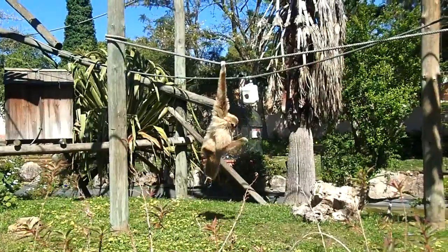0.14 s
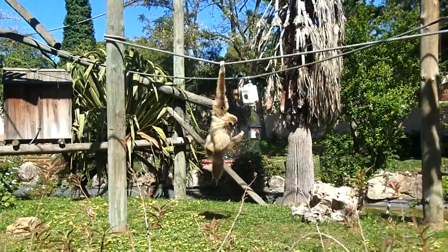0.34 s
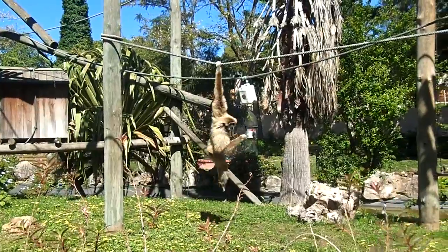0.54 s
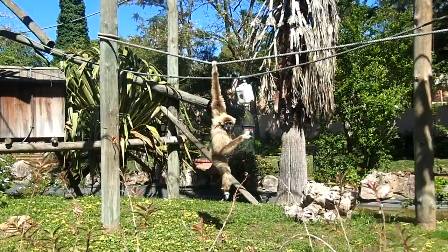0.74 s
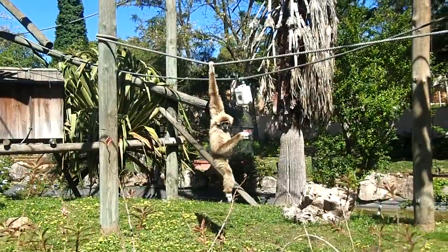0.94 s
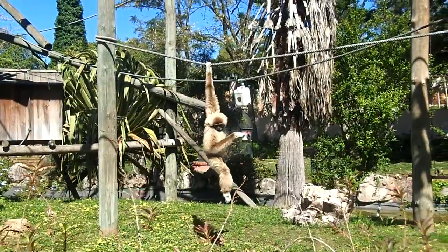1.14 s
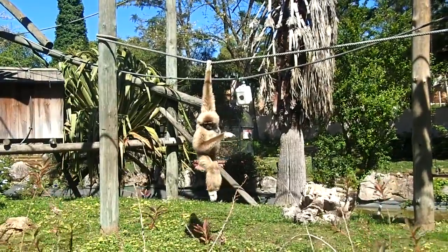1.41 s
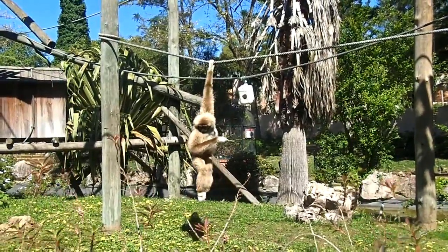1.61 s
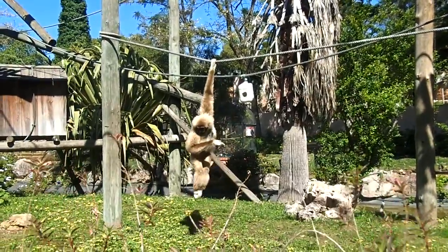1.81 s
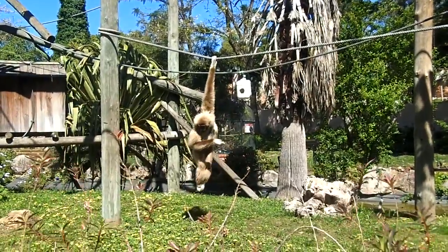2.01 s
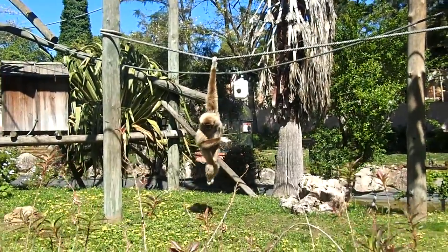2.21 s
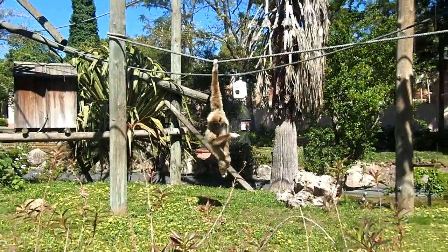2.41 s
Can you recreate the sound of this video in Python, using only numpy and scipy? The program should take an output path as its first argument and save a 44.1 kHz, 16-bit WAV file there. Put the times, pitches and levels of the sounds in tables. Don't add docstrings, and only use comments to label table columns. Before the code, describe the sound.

A gibbon gives short, rising, near-pure whoops in an open enclosure, over steady hiss and faint birds

```python
import sys
import numpy as np
from scipy import signal
from scipy.fft import rfft, irfft
from scipy.io import wavfile
from scipy.ndimage import uniform_filter1d, map_coordinates

SR = 44100
rng = np.random.default_rng(int(sys.argv[2]) if len(sys.argv) > 2 else 0)


def to_wav(s):
    ch = np.atleast_2d(s).T
    pcm = np.round(np.clip(ch, -1, 1) * 32767)
    wavfile.write(sys.argv[1], SR, pcm.astype(np.int16))


def nominal_scale(level):
    x = np.asarray(level, float) / 20
    return 10 ** x


N = 112454

# (time [s], pitch [Hz], level [dB], second partial [dB], upper partials [dB])
EARLIER_WHOOP = [
    (-.2, 739.8, -7, -40, -4),
    (-.1, 800, -32, -51, -7),
    (-.04, 903.4, -20, -48, -6),
]
WHOOPS = [
    [(0.17, 608, -46, -66, -35), (0.188, 620, -29.5, -50, -19), (0.206, 627, -18.5, -48, -1.5),
     (0.228, 677, -22, -40, -3), (0.24, 714, -24, -45, -4), (0.258, 730, -15, -38, 2.5),
     (0.34, 849.5, -14, -44, -4.5), (0.352, 871.6, -21, -38, -6), (0.368, 868, -32, -52, -29)],
    [(0.765, 595, -40, -56, -18), (0.793, 592, -40.5, -62, -13), (0.805, 612, -27.5, -50, 0),
     (0.829, 645, -21, -48, -9), (0.853, 685, -21, -56, 7), (0.864, 708, -28.5, -37, -1.5),
     (0.889, 751, -16.5, -42, -1.5), (0.925, 912.6, -19.5, -37.5, 5.5), (0.955, 901, -29, -50.5, -26)],
    [(1.34, 520, -46, -67, -25), (1.37, 538, -28.5, -71, -21), (1.392, 603, -37, -62, -20),
     (1.41, 645, -22, -61, -14), (1.43, 678, -18.5, -60, -10), (1.442, 721, -21.5, -49, -6),
     (1.456, 761, -15.5, -56, -4), (1.477, 873.5, -19.5, -39, 3.5), (1.497, 866, -21.5, -40, -13)],
]
LAST_WHOOP = [(2.07, 568, -49.5, -65, -35), (2.117, 619, -35.5, -60, -29), (2.142, 640, -19, -62, -15),
              (2.155, 663, -24, -60, -22), (2.165, 726, -42, -62, -30), (2.184, 780, -17.5, -55, -20),
              (2.202, 884, -20, -58, -11.5), (2.22, 967, -35.5, -56, -5), (2.261, 963, -36, -68, -25.5)]
# (third partial [dB], even partials [dB])
WHOOP_COLOURS = [
    (-48.5, -3),
    (-47, 2.5),
    (-40, 1.5),
    (-64, -2),
    (-49, -4),
]
# (frequency [Hz], level [dB])
THROATS = [
    [(3700, -56), (4550, -41), (5350, -31), (6100, -46), (6600, -36), (7150, -49), (7900, -38), (8800, -62)],
    [(4100, -66), (4450, -44), (4900, -54), (5550, -42), (6000, -57), (7100, -64), (7600, -52), (8100, -66)],
    [(3950, -60), (4380, -38), (4800, -47), (5250, -38), (5800, -37), (6250, -52), (7000, -54), (8000, -64)],
]
# (frequency [Hz], level [dB])
CHEEK = [(1800, -32), (2000, -9), (2120, 0.5), (2250, -5), (2400, -8), (2700, -31)]

# (frequency [Hz], level [dB per Hz])
AIR_LOW = [(18, 6.5), (30, -12), (118, -11), (245, -15), (378, -11.5), (474, -10), (706, -13), (855, -5.5),
           (1900, -26), (2470, -64), (4180, -120)]
AIR_HIGH = [(1900, -28), (2250, -24), (3100, -8.5), (3950, -31), (4700, 1.5), (7800, -5.5), (9500, -13),
            (15750, -19.5)]
# (frequency [Hz], level [dB per Hz])
WATER = [(100, -8.5), (300, -8), (500, -4), (900, -6), (1650, -2.5), (1900, -10), (2600, -16),
         (3100, -12.5)]
FLOCK = [(3200, -14.5), (4000, -18), (4600, -5.5), (5150, 0), (6300, -14), (7200, -24.5), (7900, -10.5),
         (9200, -29)]
# (time [s], level [dB])
FLOCK_LEVEL = [(0.0, -40.5), (0.18, -39.5), (0.83, -39), (1.07, -41), (1.3, -43), (1.61, -38.5),
               (2.15, -41)]
# (frequency [Hz], likeness [0 to 1])
LIKENESS = [(50, 0.86), (150, .94), (400, 0.95), (1200, 0.99), (3000, 0.97), (5500, 0.8), (8500, 0.46),
            (13000, 0.0088)]
# (frequency [Hz], left over right [dB])
LEANING = [(60, 0.43), (300, 1.2), (1500, .2), (5000, 3.4), (8000, 4.9), (13000, 1.5)]
# (frequency [Hz], level at first [dB], level later [dB], wobble [dB])
PUMP_TONES = [(50.3, -65.5, -51, 3.5), (109.6, -53, -53, 1.5), (135.6, -53.5, -72, 5)]

# (time [s], length [s], centre [Hz], level [dB])
CHIRPS = [(0.427, 0.055, 5170, -40.5), (0.614, 0.057, 5290, -41.5), (0.711, 0.023, 5440, -44),
          (0.757, 0.028, 5140, -44), (0.975, 0.027, 5090, -34.5), (1.728, 0.038, 5060, -39.5),
          (1.798, 0.053, 4970, -40.5), (1.844, 0.038, 5100, -54), (1.603, 0.065, 6190, -46),
          (1.613, 0.08, 6460, -49), (1.466, 0.03, 6630, -40.5)]
# (time [s], length [s], start pitch [Hz], end pitch [Hz], level [dB])
WHISTLES = [(.556, 0.0305, 6300, 6960, -40.5), (.585, 0.035, 7000, 6760, -47),
            (.638, 0.019, 5800, 6300, -43.5), (.66, 0.064, 6200, 6200, -47.5),
            (.725, 0.032, 4700, 4510, -41.5), (.755, 0.014, 5500, 5740, -44),
            (.936, 0.02, 4700, 4450, -39.5), (1.02, 0.033, 4500, 4580, -50), (1.12, 0.019, 5050, 5100, -42),
            (2.11, .022, 5480, 5530, -50.5), (2.128, 0.02, 5500, 4950, -48),
            (2.093, 0.009, 5100, 5430, -46), (2.2, 0.031, 5350, 5840, -54),
            (2.228, 0.044, 6100, 6500, -51.5), (2.3, 0.0152, 5900, 6300, -49),
            (2.308, 0.071, 6370, 6260, -48.5), (2.34, 0.05, 6350, 6100, -64)]
# (time [s], length [s], start pitch [Hz], end pitch [Hz], level [dB])
MATE_CALLS = [
    (.56, 0.255, 849, 880, -48),
    (1.96, 0.122, 839.4, 848, -51),
]
# (time [s], length [s], start pitch [Hz], end pitch [Hz], level [dB])
DRONE = [
    (.82, 0.452, 286.6, 289.7, -53.5),
]
# (time [s], level [dB])
TICKS = [
    (1.812, -40),
    (2.345, -48),
    (2.41, -52),
    (2.538, -49),
]

LEAD = SR // 2
T = np.arange(-LEAD, N) / SR
CHANGE_S = 1.5 + 0.6502


def rms_one(x):
    return x / np.sqrt(np.mean(x ** 2) + 1e-20)


def at_hz(points, hz):
    table_hz, values = np.array(points)[:, 0], np.array(points)[:, 1]
    return np.interp(np.log(hz), np.log(table_hz), values)


def drift(rate):
    knots = rng.standard_normal(400)
    place = np.clip(np.arange(N) / SR * rate * 2, 0, 399)
    return map_coordinates(knots, [place], order=3)


def shaken(width_hz):
    low_pass = signal.butter(2, width_hz, fs=SR, output="sos")
    a, b = signal.sosfilt(low_pass, rng.standard_normal((2, len(T))))
    return rms_one(a) + 1j * rms_one(b)


def gate(start, length, edge):
    inside = np.minimum(T - start, start + length - T)
    return np.sin(np.pi / 2 * np.clip(inside / edge, 0, 1)) ** 2


def glides(rows, edge, second_db, shake):
    out = 0
    waver = 1 + shake * shaken(70.0)
    for start, length, from_hz, to_hz, db in rows:
        hz = np.interp(T, [start, start + length], [from_hz, to_hz])
        turn = np.exp(2j * np.pi * np.cumsum(hz) / SR)
        tone = np.real(waver * (turn + nominal_scale(second_db) * turn ** 2))
        out = out + nominal_scale(db) * gate(start, length, edge) * tone
    return out


def hiss(spectrum, patchy_db):
    hz = np.maximum(np.arange(N // 2 + 1) * SR / N, 1)
    inside = (hz > spectrum[0][0]) & (hz < spectrum[-1][0])
    mid, side = rfft(rng.standard_normal((2, N))) * nominal_scale(at_hz(spectrum, hz)) * inside
    alike = np.clip(at_hz(LIKENESS, hz), 0, 1)
    lean = at_hz(LEANING, hz) / 2
    pair = np.sqrt(1 + alike) * mid + np.sqrt(1 - alike) * side * [[1], [-1]]
    pair = pair * nominal_scale([lean, -lean])
    band = np.round(2 * np.log2(hz))
    together = drift(3.05)
    out = 0
    for k in np.unique(band[inside]):
        flicker_db = patchy_db * (1.24 * together + drift(11.0))
        out = out + irfft(pair * (band == k), N) * nominal_scale(flicker_db)
    return rms_one(out)


def echoes(x, wet_db):
    early_t60_s, late_t60_s, late_db, gap_s = 0.31, 1.135, -10, 0.0119
    side_db = -54
    t = np.arange(SR) / SR
    shape = nominal_scale(-60 * t / early_t60_s) + nominal_scale(late_db - 60 * t / late_t60_s)
    shape = shape * (t > gap_s)
    mid, side = rng.standard_normal((2, SR)) * shape / np.sqrt(np.sum(shape ** 2))
    pair = mid + nominal_scale(side_db) * side * [[1], [-1]]
    wet = signal.fftconvolve(pair, x[None])[:, :len(T)]
    return (x + nominal_scale(wet_db) * wet)[:, LEAD:]


def in_enclosure(x, wet_db):
    fade_s, after_echo_db = 0.002, -0.5
    before = np.clip((CHANGE_S + fade_s - T) / fade_s, 0, 1)
    old = x * before
    old_echoes = echoes(old, wet_db) - old[LEAD:]
    new = echoes(x * (1 - before), wet_db + after_echo_db)
    return old_echoes * before[LEAD:] + old[LEAD:] + new


def whoop_overtones(angle, hz, row_curves, throat, colour, flutter):
    outside_db_per_khz = -14
    second_db, upper_db = row_curves
    third_db, even_db = colour
    over = nominal_scale(second_db) * flutter[2] * np.sin(2 * angle)
    over += nominal_scale(third_db + at_hz(CHEEK, 3 * hz)) * flutter[3] * np.sin(3 * angle)
    for k in range(4, 15):
        beyond_hz = np.abs(k * hz - np.clip(k * hz, throat[0][0], throat[-1][0]))
        db = upper_db + at_hz(throat, k * hz) + even_db * (1.5 - k % 2)
        db = db + outside_db_per_khz * beyond_hz / 1000
        over += nominal_scale(db) * flutter[k] * np.cos(k * angle + k * k)
    return over


def gibbon():
    flutter_db, edge_s = 2.6, 0.0053
    slip, angle_at_change, slip_s = -5.9, 0.3, 0.0017
    change = int(CHANGE_S * SR) + LEAD
    flutter = [nominal_scale(flutter_db * shaken(36.0).real) for k in range(15)]
    whoops = WHOOPS + [LAST_WHOOP, EARLIER_WHOOP]
    throats = THROATS + [THROATS[2], THROATS[0]]
    out = 0
    for rows, throat, colour in zip(whoops, throats, WHOOP_COLOURS):
        s, *columns = np.transpose(rows)
        curves = [uniform_filter1d(np.interp(T, s, c), size=200) for c in columns]
        hz, db, *row_curves = curves
        angle = 2 * np.pi * np.cumsum(hz) / SR
        angle += slip * np.clip((T - CHANGE_S) / slip_s, 0, 1) - angle[change] + angle_at_change
        over = whoop_overtones(angle, hz, row_curves, throat, colour, flutter)
        over *= np.abs(T - CHANGE_S) > 0.01
        voice = nominal_scale(db) * np.cos(angle) + over
        out = out + np.sqrt(2) * gate(s[0], s[-1] - s[0], edge_s) * voice
    return out


def background():
    t = T[LEAD:]
    air = nominal_scale(-46) * hiss(AIR_LOW, patchy_db=1.5) + nominal_scale(-47) * hiss(AIR_HIGH, patchy_db=0.6)
    flock_db = np.interp(t, *np.transpose(FLOCK_LEVEL)) - 3.5
    water = nominal_scale(-44.5) * hiss(WATER, patchy_db=1.46)
    flock = nominal_scale(flock_db) * hiss(FLOCK, patchy_db=2.2)
    return air + (water + flock) * np.clip((CHANGE_S - t) / 0.0014, 0, 1)


def pump():
    settle_s, after_change_db = 1, -5
    t = T[LEAD:]
    out = 0
    for hz, first_db, later_db, wobble_db in PUMP_TONES:
        db = np.interp(t, [0, settle_s], [first_db, later_db])
        db = db + after_change_db * (t > CHANGE_S) * (hz > 80)
        db = db + wobble_db * drift(10.0)
        angle = 2 * np.pi * hz * t + 0.43 * wobble_db * drift(1.7)
        out = out + np.sqrt(2) * nominal_scale(db) * np.sin(angle)
    return out


def twitter():
    per_s, level_db, length_s = 50, -52, 0.0227
    centre_hz, pitch_spread, slide_spread = 5250, 0.075, 0.028
    draws = rng.standard_normal((150, 4))
    starts = np.cumsum(np.abs(draws[:, 0])) * 1.1 / per_s - 0.1
    out = np.zeros(len(T) + SR)
    t = np.arange(int(length_s * SR)) / SR
    for start, (_, pitch, slide, size) in zip(starts, draws):
        if start < CHANGE_S - length_s:
            hz = centre_hz * np.exp(pitch_spread * pitch + slide_spread * slide * t / length_s)
            tone = np.hanning(len(t)) * np.sin(2 * np.pi * np.cumsum(hz) / SR)
            i = int(start * SR) + LEAD
            out[i:i + len(t)] += nominal_scale(level_db + 3.4 * size) * tone
    return out[:len(T)]


def chirps():
    shake = shaken(270)
    out = 0
    for start, length, hz, db in CHIRPS:
        rasp = np.real(shake * np.exp(2j * np.pi * hz * T))
        out = out + nominal_scale(db) * gate(start, length, 0.0039) * rasp
    return out


def whistles():
    return glides(WHISTLES, 0.0013, second_db=-54, shake=1)


def mate():
    return glides(MATE_CALLS, 0.028, second_db=2, shake=0.022)


def drone():
    return glides(DRONE, 0.11, second_db=-40, shake=0.13)[LEAD:]


def ticks():
    snaps = sum(nominal_scale(db) * gate(start, 0.0031, 0.00075) for start, db in TICKS)
    snaps = snaps * rng.standard_normal(len(T))
    band = signal.butter(2, [1500, 6000], "band", fs=SR, output="sos")
    return signal.sosfilt(band, snaps)[LEAD:]


def scene():
    ape_pan_db, bird_pan_db = 0.57, 2
    ape = in_enclosure(gibbon(), -8.5) * nominal_scale([[ape_pan_db], [-ape_pan_db]])
    birds = in_enclosure(twitter() + chirps() + whistles(), -6.5)
    birds = birds * nominal_scale([[bird_pan_db], [-bird_pan_db]])
    far_mate = in_enclosure(mate(), -7)
    return ape + background() + pump() + birds + far_mate + drone() + ticks()


def top_cut(x):
    return signal.sosfilt(signal.butter(12, 15790, fs=SR, output="sos"), x)


def record(dry):
    notch_hz, notch_width_hz, rumble_cut_hz, offset = 4810, 195, 46, -0.002
    notched = signal.lfilter(*signal.iirnotch(notch_hz, notch_hz / notch_width_hz, fs=SR), dry)
    high_pass = signal.butter(2, rumble_cut_hz, "high", fs=SR, output="sos")
    cut = signal.sosfilt(high_pass, 0.35 * dry + 0.77 * notched)
    after_change = np.clip((T[LEAD:] - CHANGE_S) / 0.009, 0, 1)
    return top_cut(cut + offset * after_change)


dry = scene()
out = record(dry)
to_wav(out)
```